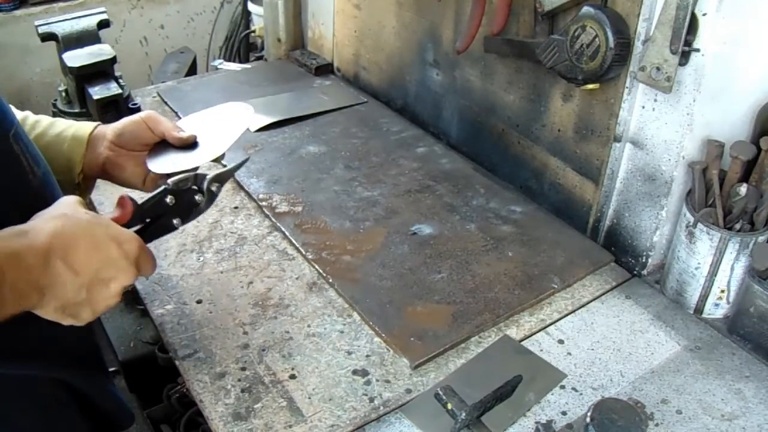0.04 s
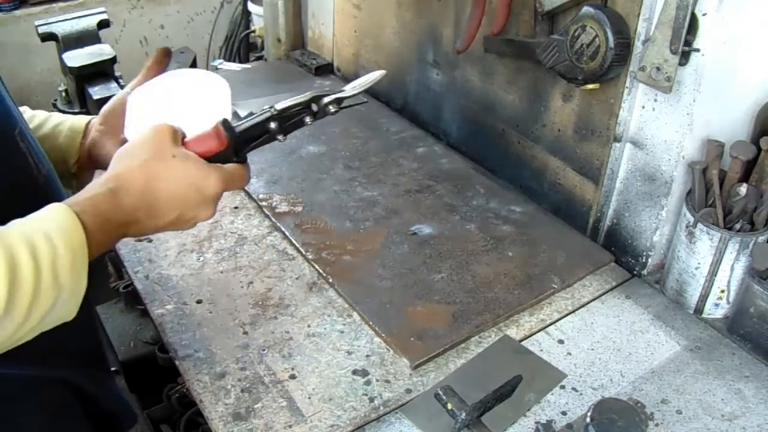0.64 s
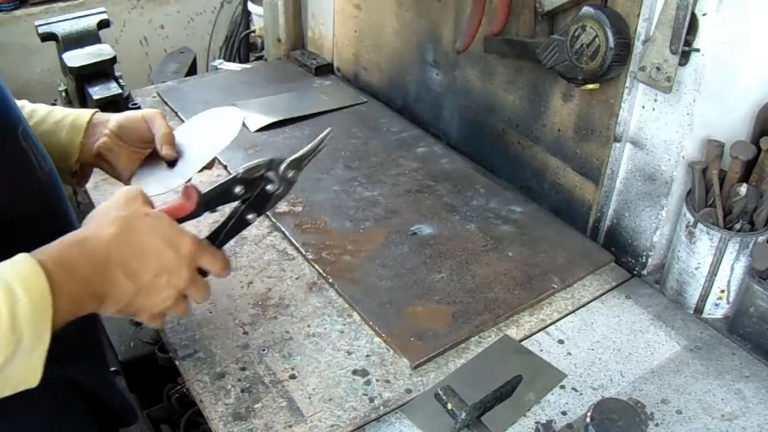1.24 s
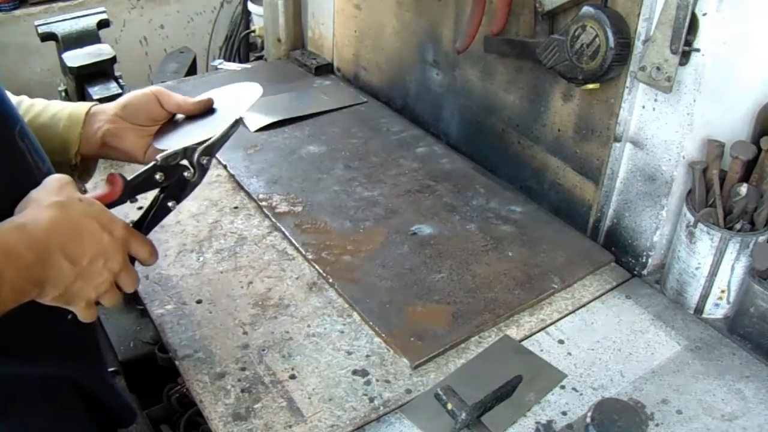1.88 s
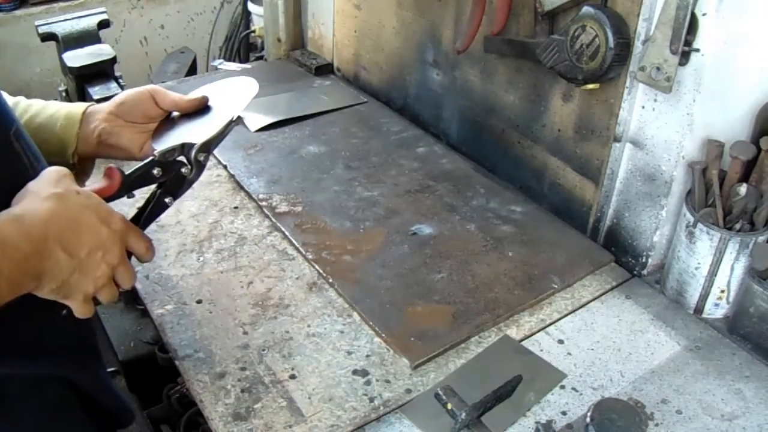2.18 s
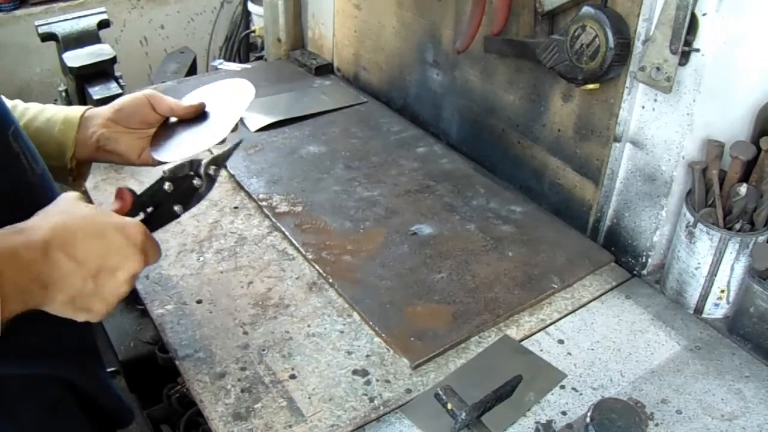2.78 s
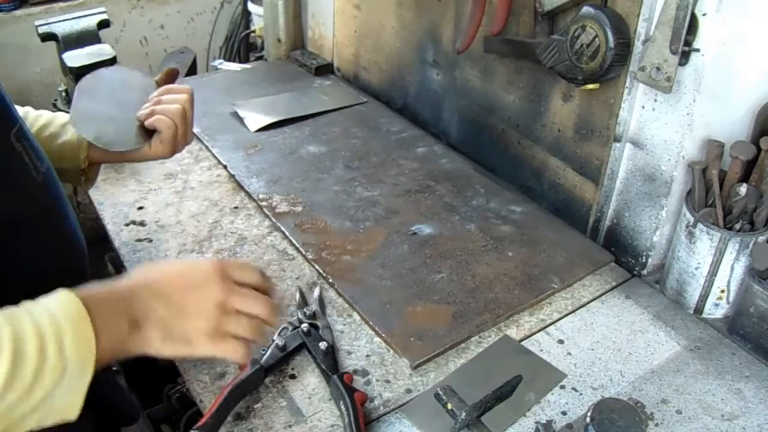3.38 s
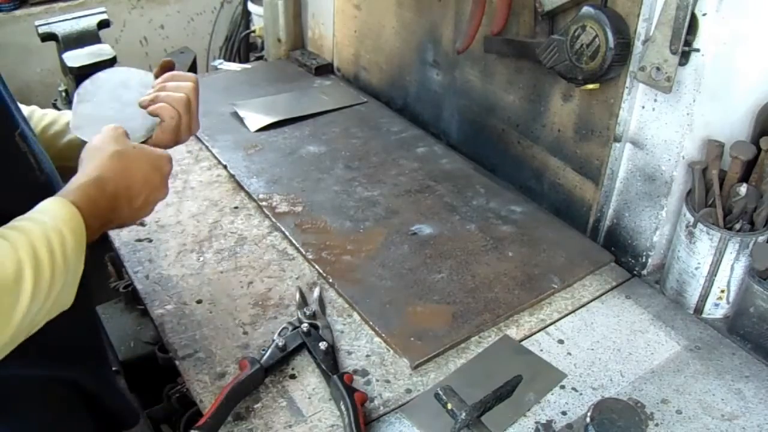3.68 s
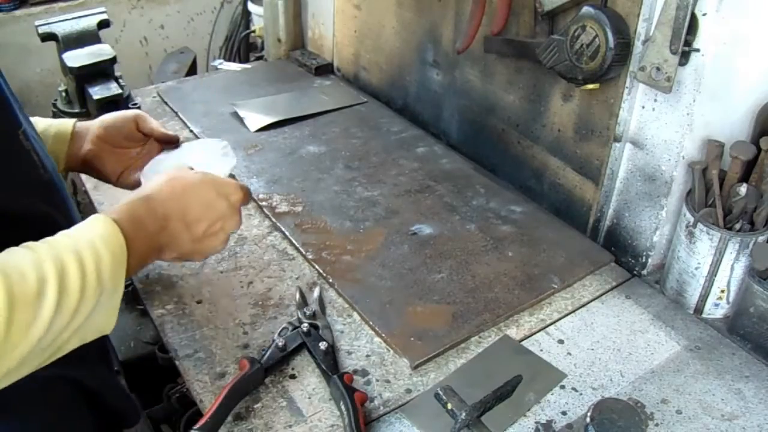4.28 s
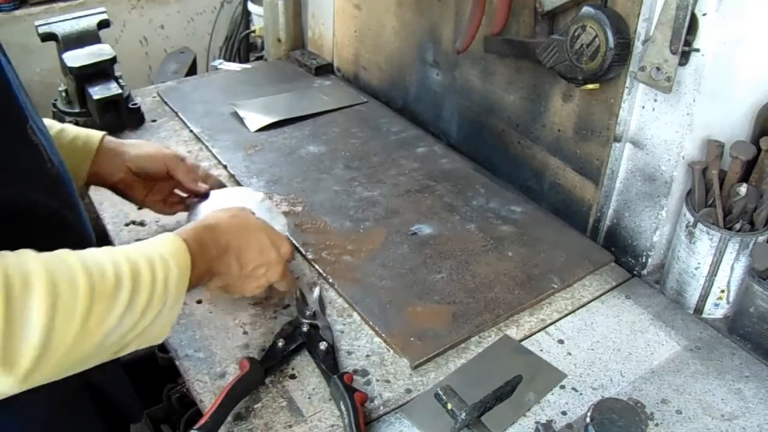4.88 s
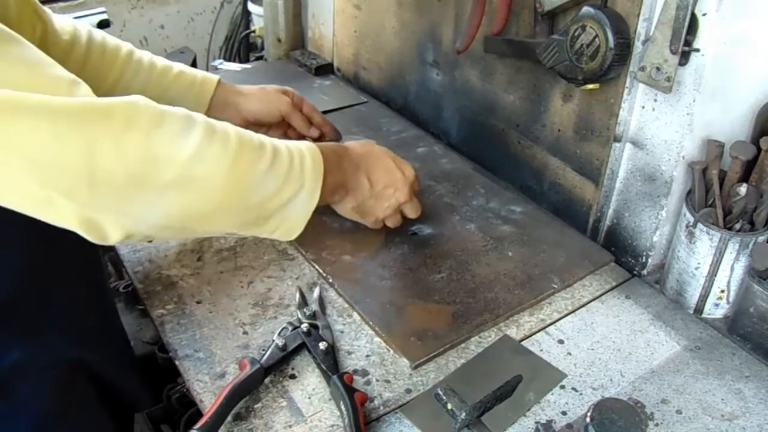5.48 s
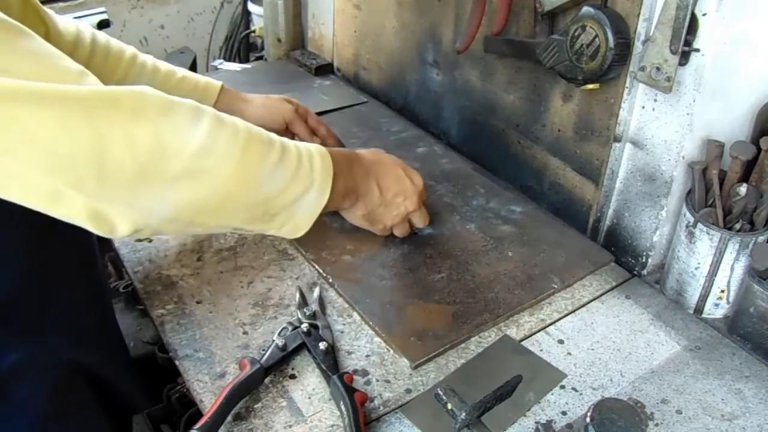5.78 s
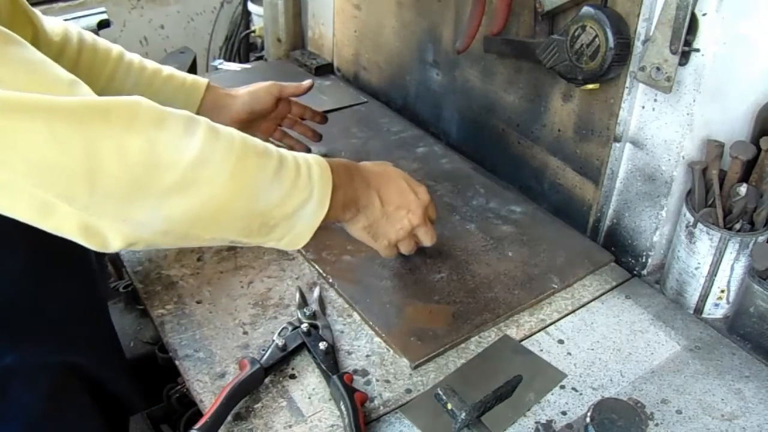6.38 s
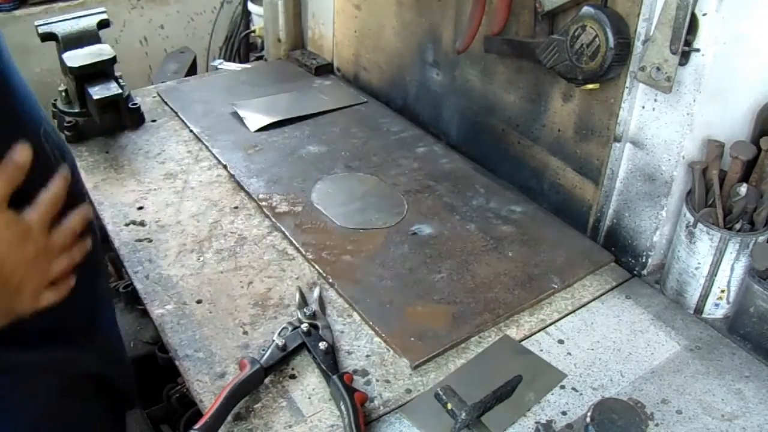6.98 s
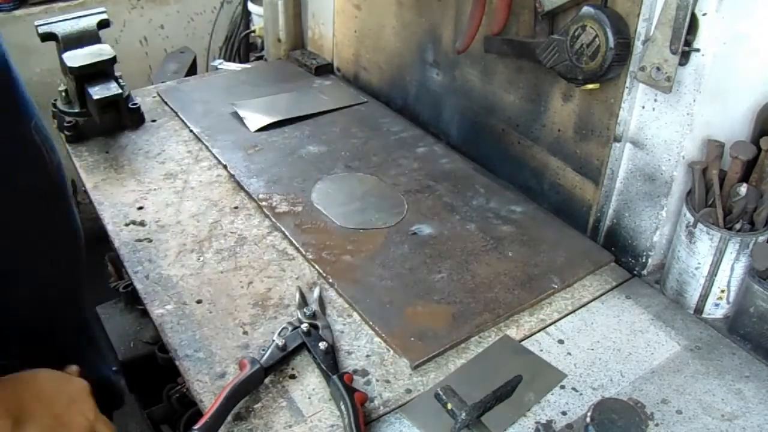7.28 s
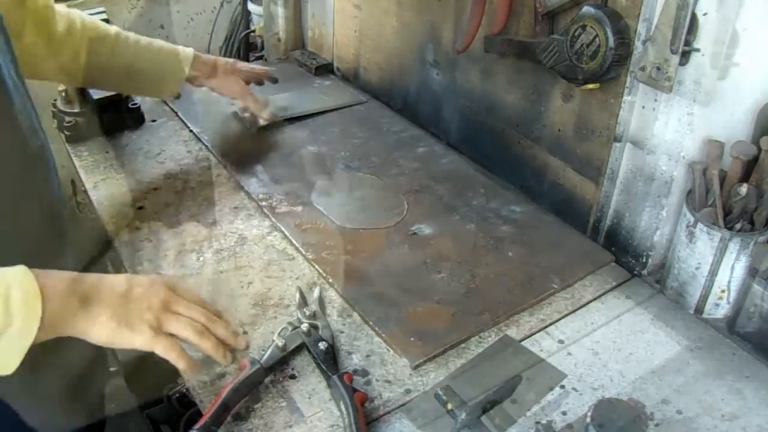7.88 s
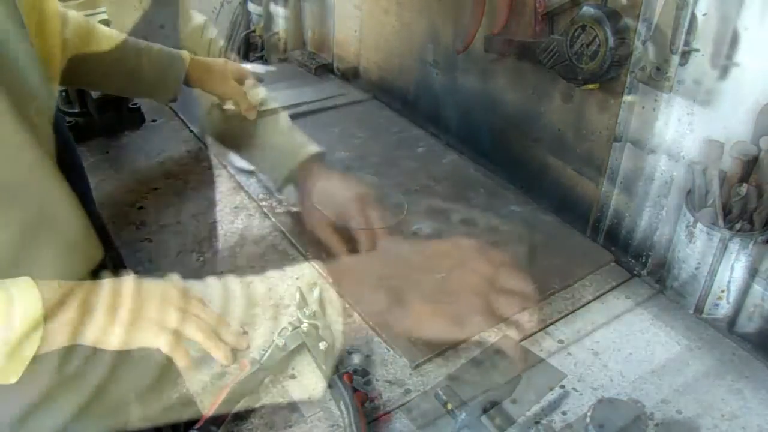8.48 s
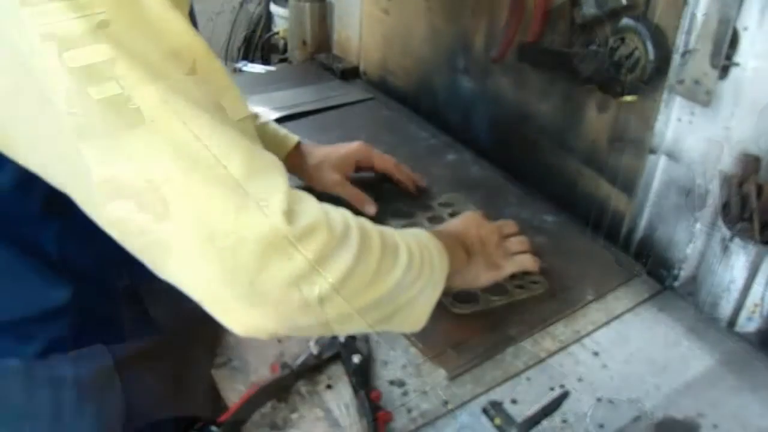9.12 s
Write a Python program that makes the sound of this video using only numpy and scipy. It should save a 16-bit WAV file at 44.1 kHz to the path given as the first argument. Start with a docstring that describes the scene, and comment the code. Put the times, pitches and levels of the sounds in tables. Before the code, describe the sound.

In a small workshop, hand snips bite twice through thin sheet steel with sharp ringing snaps, then are laid on the bench with a dull knock. A cut disc drops loudly on a steel plate and rattles flat. Loose sheet clatters brightly and is scraped over the plate in short pushes. The metal sounds close; outside, a distant engine changes speed and a small bird chirps faintly.

```python
"""Snipping sheet steel in a small workshop

Snips bite through thin sheet steel and are laid on the bench with a dull knock. The cut disc drops
on a steel plate and rattles flat; loose sheet is dropped and scraped over the plate. Each contact
cracks and rings. Outside, a distant engine changes speed and a small bird chirps over the street."""
import sys
import numpy as np
from scipy import signal
from scipy.fft import rfft, irfft, next_fast_len
from scipy.io import wavfile
from scipy.ndimage import uniform_filter1d, map_coordinates

SR = 44100
rng = np.random.default_rng(int(sys.argv[2]) if len(sys.argv) > 2 else 0)


def dump_mix(stems):
    """Bounce the given channels to the path in sys.argv[1] as a 16-bit WAV at rate SR."""
    frames = np.atleast_2d(stems).T  # one column per channel
    limited = np.clip(frames, -1, 1)  # hard clip at full scale
    pcm = np.round(limited * 32767).astype(np.int16)
    wavfile.write(sys.argv[1], SR, pcm)


N = 407925

# ring-out of the steel's crowded modes: (frequency [Hz], t60 [s])
STEEL_T60 = [(200, 0.057), (900, 0.08), (2500, 0.19), (7000, .18), (13000, 0.14)]
# clear modes of the loose sheet: (frequency [Hz], weight [dB])
SHEET_RING = [(2132, -1.5), (2820, 2), (4377, -14), (4834, -6.5), (5033, -0.5), (6067, -10), (6858, -0.5),
              (7031, -4.5), (8102, -7.5), (9388, 0.5), (10260, 0), (10930, -5.5), (11720, -5.5),
              (12150, 5.5)]
# spectrum of the grainy and the fine hiss: (frequency [Hz], weight [dB])
HISS_COLOUR = [(1500, -27), (3400, -6), (5500, -12.5), (8000, -8.5), (11500, -0.5), (14000, -2)]
# swell of the street's wash: (time [s], level [dB])
STREET_SWELL = [(0, -52), (2.1, -49.5), (2.8, -50.5), (5.2, -48.5), (5.9, -44), (7.7, -49.5), (8.3, -42.5),
                (9.25, -46.5)]


def snips():
    """The jaws click and snap through the sheet, setting the steel ringing."""
    bites = [(.0915, -30, -4.5), (.1, -22.5, -5), (.106, -3, 0), (.113, -14, 0), (.121, -8.5, -0.5),
             (1.175, -41, 9), (2.06, -31, -2), (2.139, -36, -0.5), (2.852, -18, -2.5), (2.859, -3.5, -1),
             (2.867, -10.5, 1.5)]  # jaw contacts: (time [s], level [dB], brightness [dB/octave])
    colour = [(40, -20), (160, -10), (300, -24.5), (600, -12), (1500, -11), (2800, -6), (5000, -3.5),
              (9000, -4), (12500, 0.5), (14000, -3)]  # spectrum of a bite: (frequency [Hz], weight [dB])
    modes = [(2939, -6), (5023, -4), (6261, -8.5), (6799, 2.5), (8333, -9.5), (10070, -7), (11460, -3.5),
             (11860, -5.5), (13200, -0.5)]  # clear ring: (frequency [Hz], weight [dB])
    return blows(bites, crowded(colour, depth_db=2.5), STEEL_T60, modes,
                 ring_db=-7, ring_t60=0.15, crack=0.34, crack_s=0.012)


def disc():
    """The cut disc lands on the plate and rocks on its rim until it lies flat."""
    landings = [(6.338, -5.5, 0.5), (6.35, 1, 2), (6.364, -10.5, -3), (6.379, -4.5, 2), (6.409, -21, -2),
                (6.44, -25, 2), (6.455, -12, 1.5), (6.485, -29, 1), (6.516, -21.5, 0.5),
                (6.527, -26.5, -1.5), (6.552, -28.5, 0.5)]  # rim contacts: (time [s], level [dB], brightness [dB/octave])
    colour = [(40, -27.5), (120, -14), (380, -18), (500, -10), (720, -24), (1700, -8.5), (3000, -8),
              (5200, -7), (9500, -5.5), (13000, 4.5), (14000, -7)]  # spectrum of a landing: (frequency [Hz], weight [dB])
    decay = [(200, 0.1), (700, 0.18), (1700, 0.23), (7000, 0.23), (13000, 0.17)]  # ring-out of the crowded modes: (frequency [Hz], t60 [s])
    modes = [(1880, -9.5), (2815, -8.5), (3688, -4), (4420, -10.5), (5025, -7), (5356, -7), (6309, -8),
             (7014, -11.5), (7752, -2.5), (8015, 0.5), (8780, -4), (9545, -7.5), (10080, -2.5), (10400, -7),
             (10552, -8), (11139, -3), (11583, 2.5), (12048, -4), (12877, -4), (13154, -0.5), (13438, -0.5),
             (13905, -1.5)]  # clear ring: (frequency [Hz], weight [dB])
    return blows(landings, crowded(colour, depth_db=4), decay, modes,
                 ring_db=-3.5, ring_t60=0.27, crack=0.45, crack_s=0.0046)


def loose_sheet():
    """Loose sheet taps the plate and rings brightly."""
    taps = [(7.438, -49.5, -1), (7.499, -40.5, 1), (7.614, -26.5, -6), (7.622, -20.5, -6.5),
            (7.649, -2.5, 2), (7.662, -14.5, -5.5), (7.68, -2, 1), (7.779, -18.5, 0.5), (8.29, -28, -1),
            (8.577, -20, 3.5)]  # plate contacts: (time [s], level [dB], brightness [dB/octave])
    colour = [(40, -41), (600, -26.5), (1700, -16), (2800, -16.5), (3400, -12), (5000, -9.5), (9500, -1.5),
              (12200, 7), (14000, -6.5)]  # spectrum of a tap: (frequency [Hz], weight [dB])
    return blows(taps, crowded(colour, depth_db=5), STEEL_T60, SHEET_RING,
                 ring_db=-5.5, ring_t60=0.22, crack=0.17, crack_s=0.0026)


def bench():
    """The heavy bench answers snips, hands and the falling disc with a dull knock."""
    knocks = [(.569, -45.5, 3), (3.3575, -19.5, 2.5), (3.428, -23, 2), (3.438, -22, -4), (3.489, -30, -4),
              (6.35, -26, 1.5), (7.118, -48.5, 5.5), (8.625, -31.5, 2)]  # bench contacts: (time [s], level [dB], brightness [dB/octave])
    colour = [(60, -35), (230, -4.5), (430, -0.5), (920, -7.5), (1500, -16.5), (3000, -29), (12000, -47),
              (14000, -59)]  # spectrum of a knock: (frequency [Hz], weight [dB])
    decay = [(200, 0.36), (1000, 0.19), (4000, 0.42), (12000, 0.29)]  # ring-out of the crowded modes: (frequency [Hz], t60 [s])
    modes = [(226, 7), (275, -22), (393, -7.5), (447, -7), (576, -2.5), (727, -1.5), (880, -3.5), (960, -5),
             (1340, -8.5), (1650, -10.5)]  # low body tones: (frequency [Hz], weight [dB])
    return blows(knocks, crowded(colour, depth_db=1), decay, modes,
                 ring_db=-1.5, ring_t60=0.28, crack=0.25, crack_s=0.003991)


def sliding(grit_db=1.15, ring_db=-17, width_hz=90):
    """Sliding steel catches on tiny burrs and sings in the sheet's modes."""
    pushes = [(7.655, 0.015, -12), (7.735, 0.021, -22.5), (8.305, 0.011, -31), (8.44, 0.072, -31.5),
              (8.585, 0.027, -23), (8.72, 0.054, -25), (8.83, 0.059, -29.5)]  # shoves over the plate: (time [s], length [s], level [dB])
    colour = [(60, -37), (450, -16), (1200, -13.5), (2000, -9), (8000, -6.5), (12400, -1.5), (14000, -3.5)]  # spectrum of the scrape: (frequency [Hz], weight [dB])
    scrape = patchy(noise(crowded(colour, depth_db=3.5)), depth_db=3)
    scrape *= amp(grit_db * wobble(500))
    ring = filtered(scrape, lambda f: sum(
        amp(db) * 1j * f * width_hz / (hz * hz - f * f + 1j * f * width_hz) for hz, db in SHEET_RING))
    slide = unit(unit(scrape) + amp(ring_db) * unit(ring))
    return swells(pushes, rise_db_per_s=372, fall_db_per_s=172.5) * slide


def grainy_hiss():
    """Grainy hiss swells and fades: light brushing, and a brief rise of hiss at 7.15 s."""
    rises = [(.33, 0.1, -59), (.58, 0.065, -54.5), (.75, 0.57, -50.5), (1.41, .1, -48), (1.7, 0.69, -57.5),
             (3.24, .27, -55.5), (4.33, 0.047, -50.5), (4.74, 0.05, -47.5), (7.15, 0.2, -53),
             (8.05, .2, -56)]  # swells of hiss: (time [s], length [s], level [dB])
    hiss = patchy(noise(crowded(HISS_COLOUR, depth_db=3)), depth_db=0.5)
    grain = amp(2 * wobble(22) + 2.3 * wobble(350))
    return swells(rises, rise_db_per_s=190, fall_db_per_s=114) * unit(hiss * grain)


def engine(beat_hz=3.3, beat_db=-6.5):
    """Only low firing orders pass the walls: a throbbing drone and a wavering buzz over a rumble."""
    speed = [(0, 55.92), (.3, 54.43), (.7, 45.01), (1.2, 54.8), (2, 58.99), (2.7, 62), (3.05, 62.13),
             (3.65, 55.01), (4.4, 57.95), (5.2, 59.47), (6.3, 60.7), (6.6, 55.16), (7.1, 53.63),
             (9.25, 52.7)]  # engine speed: (time [s], firing rate [Hz])
    levels = [(0, -52.5, -64), (.75, -60.5, -62), (1.35, -49.5, -70), (2.1, -53, -57.5), (2.85, -46.5, -59),
              (3.25, -49, -52), (3.7, -39.5, -49), (4.12, -38, -51), (4.4, -50.5, -54), (5.2, -44, -49.5),
              (5.85, -40.5, -43), (6.8, -42.5, -45.5), (8.2, -41, -42), (9.25, -38.5, -45.5)]  # loudness before ducking: (time [s], drone [dB], buzz [dB])
    orders = [(1, -6.5), (3, -8.5), (4, -3), (5, -8.5), (6, -8.5), (8, -16)]  # partials of the buzz: (order [x firing rate], weight [dB])
    colour = [(20, 5.5), (50, 8), (80, 3.5), (150, -8), (310, -13.5), (420, -16.5), (900, -38.5)]  # spectrum of the rumble: (frequency [Hz], weight [dB])
    firing_hz = curves(speed)[0] * (1 + 0.006 * wobble(14))
    phase = 2 * np.pi * np.cumsum(firing_hz) / SR
    beat = 2 * np.pi * np.cumsum(beat_hz * (1 + 0.25 * wobble(1.7))) / SR
    drone_db, buzz_db = curves(levels)
    street_db, duck_db = curves(STREET_SWELL)[0], ducking()
    # a weaker tone just beside the drone makes it throb
    drone = np.sin(2 * phase) + amp(beat_db) * np.sin(2 * phase + beat)
    hum = amp(drone_db + 0.43 * duck_db) * drone
    for order, db in orders:
        gain = amp(buzz_db + 0.91 * duck_db + db + 2.7 * wobble(12))
        hum += gain * np.sin(order * phase + 0.26 * wobble(12))
    rumble_db = -49 + 0.19 * (street_db - street_db.mean()) + 0.063 * duck_db
    return np.sqrt(2) * hum + amp(rumble_db) * noise(colour)


def bird(high_hz=4660, low_hz=3700, length_s=0.11, rasp=0.042):
    """Each chirp holds a thin high note, then falls to a raspy low one; walls echo it."""
    calls = [(.615, -55), (1.457, -50.5), (4.335, -52.5), (4.775, -48), (5.61, -48), (6.219, -44.5),
             (6.975, -68.5), (9.075, -47.5)]  # chirps: (time [s], relative level [dB])
    track, progress = np.zeros(N), np.linspace(0, 1, int(length_s * SR))
    for s, db in calls:
        detune = 0.012 * rng.standard_normal()
        flutter = rasp * (0.15 + 2 * progress) * wobble(500)[:len(progress)]
        hz = np.interp(progress, [0.3, 0.5], [high_hz, low_hz]) * (1 + detune + flutter)
        swell = np.interp(progress, [0, 0.14, 0.42, 0.68, 1], [0.45, 1.7, 0.52, 1.6, 0.089])
        add(track, s, amp(db) * swell * np.sin(2 * np.pi * np.cumsum(hz) / SR))
    return 0.5 * track + 0.77 * echoes(track, t60=0.33)


def air(hiss_db=-64):
    """The broad wash of street and workshop with a fine hiss; both duck after loud blows."""
    colour = [(150, -9.5), (300, -1.5), (400, -11.5), (750, -13), (1300, -18), (2400, -22), (4000, -21.5),
              (11000, -32), (14000, -41.5)]  # spectrum of the wash: (frequency [Hz], weight [dB])
    wash = amp(curves(STREET_SWELL)[0] + 0.31 * wobble(7)) * noise(colour)
    return amp(ducking()) * (wash + amp(hiss_db) * noise(HISS_COLOUR))


def ducking(attack_s=0.02):
    """Background gain in dB: it sinks at both cuts and the disc's fall, holds, then swells back."""
    ducks = [(.11, 7.5, 0.27, 1.2), (2.86, 8.5, 0.71, 1.05), (6.351, 20, 0.66, 0.44)]  # background drops: (time [s], depth [dB], hold [s], recovery [s])
    t = np.arange(N) / SR
    return -sum(np.interp(t, s + np.cumsum([0, attack_s, hold, recovery]), [0, db, db, 0])
                for s, db, hold, recovery in ducks)


def blows(rows, colour, decay, modes, ring_db, ring_t60, crack, crack_s):
    """Each contact gives a crack, a wash of crowded modes and near reflections, and a clear ring."""
    track, t = np.zeros(N), np.arange(SR * 3 // 4) / SR
    mode_hz, mode_db = np.transpose(modes)[:, :, None]
    for s, db, tilt in rows:
        hz, age, bands = signal.stft(noise(colour, len(t), tilt), SR, nperseg=256)
        fade = amp(-60 * age / along(decay, hz)[:, None])
        wash = signal.istft(bands * fade, SR, nperseg=256)[1][:len(t)]
        wash *= 1 + crack * np.exp(-t / crack_s)
        # a hard, bright contact favours the high modes, a soft one the low; each weights them anew
        weight = amp(mode_db + 2 * tilt * np.log2(mode_hz) + 2 * rng.standard_normal(mode_hz.shape))
        phase = 2 * np.pi * (mode_hz * t + rng.random(mode_hz.shape))
        ring = np.sum(weight * np.sin(phase), axis=0) / np.linalg.norm(weight)
        ring *= amp(-60 * t / ring_t60)
        add(track, s, amp(db) * (wash + amp(ring_db) * ring))
    return track


def crowded(colour, depth_db, spacing_hz=45):
    """Hundreds of close modes bunch into fixed peaks and gaps all along a spectrum."""
    hz = np.arange(0, SR / 2, spacing_hz)
    return np.column_stack([hz, along(colour, hz) + depth_db * rng.standard_normal(SR)[:len(hz)]])


def patchy(x, depth_db):
    """The contact point wanders, so resonances swell and fade on their own."""
    bands = signal.stft(x, nperseg=1024)[2]
    patches = uniform_filter1d(rng.standard_normal(bands.shape), size=3, axis=0)
    patches = uniform_filter1d(patches, size=7, axis=1)
    return unit(signal.istft(bands * amp(depth_db * unit(patches)), nperseg=1024)[1][:N])


def swells(rows, rise_db_per_s, fall_db_per_s):
    """A gain envelope: each swell rises, holds for its length and dies away."""
    t, power = np.arange(N) / SR, np.zeros(N)
    for s, length, db in rows:
        before, after = np.maximum(s - t, 0), np.maximum(t - s - length, 0)
        power += amp(db - rise_db_per_s * before - fall_db_per_s * after) ** 2
    return np.sqrt(power)


def echoes(x, t60):
    """The diffuse answer of the walls."""
    t = np.arange(SR // 2) / SR
    tail = rng.standard_normal(len(t)) * amp(-60 * t / t60)
    return signal.fftconvolve(x, tail / np.linalg.norm(tail))[:N]


def amp(db):
    """Decibels to gain."""
    return 10 ** (np.asarray(db) / 20)


def unit(x):
    """x at rms 1."""
    return x / np.sqrt(np.mean(x ** 2) + 1e-20)


def along(points, hz):
    """(Hz, value) points read on a log axis."""
    f, v = np.transpose(points)
    return np.interp(np.log(hz + 1), np.log(f + 1), v)


def curves(rows):
    """One value per sample for each column after the time."""
    s, *cols = np.transpose(rows)
    return [np.interp(np.arange(N) / SR, s, c) for c in cols]


def wobble(rate):
    """A smooth random curve, rate knots a second."""
    return map_coordinates(rng.standard_normal(int(N * rate / SR) + 4), [np.arange(N) * rate / SR])


def filtered(x, response):
    """x shaped by a frequency response."""
    size = next_fast_len(len(x) + SR // 4)
    return irfft(rfft(x, size) * response(np.fft.rfftfreq(size, 1 / SR)), size)[:len(x)]


def noise(colour, size=N, tilt=0):
    """Noise of rms 1 with a spectrum, tilted in dB per octave."""
    white = rng.standard_normal(size)
    return unit(filtered(white, lambda hz: amp(along(colour, hz) + tilt * np.log2(np.maximum(hz, 200)))))


def add(track, s, sound):
    """Mix a sound into the track at time s."""
    part = track[round(s * SR):][:len(sound)]
    part += sound[:len(part)]


def scene():
    """The work at the bench, its small room, and the world outside."""
    work = snips() + disc() + loose_sheet() + bench() + sliding() + grainy_hiss()
    room = amp(-17) * echoes(work, t60=0.067)
    return (work + room + engine() + air() + bird())[None]


def record(dry, ceiling=0.87, dip_s=0.021, top_hz=14250, final_top_hz=15500, low_cut_hz=25):
    """The level dips briefly a few times; the top is cut; the loudest blows overload the microphone."""
    dips = [(7.457, -4), (7.74, -28.5), (8.001, -17.5), (8.365, -25), (8.829, -12), (9.089, -10.5)]  # brief drops in level: (time [s], gain [dB])
    gain_db = np.zeros(N)
    for s, db in dips:
        add(gain_db, s, np.full(int(dip_s * SR), db))
    sound = dry[0] * uniform_filter1d(amp(gain_db), size=40)
    sound = filtered(sound, lambda hz: 1 / np.sqrt(1 + (hz / top_hz) ** 240))
    # overload flattens the tops of the sharpest blows
    sound = sound / (1 + np.abs(sound / ceiling) ** 6) ** (1 / 6)
    passband = lambda hz: hz / np.hypot(hz, low_cut_hz) / np.sqrt(1 + (hz / final_top_hz) ** 240)
    return filtered(sound, passband)[None]


dry = scene()
out = record(dry)
dump_mix(out)
```